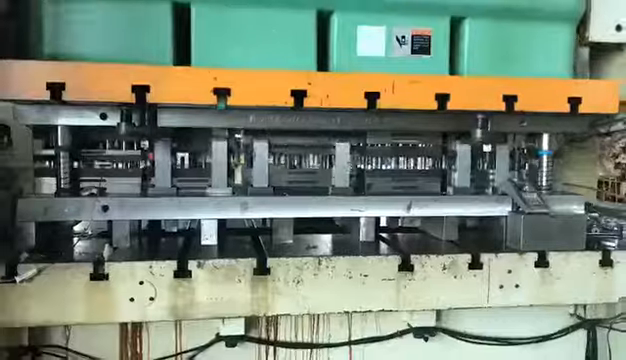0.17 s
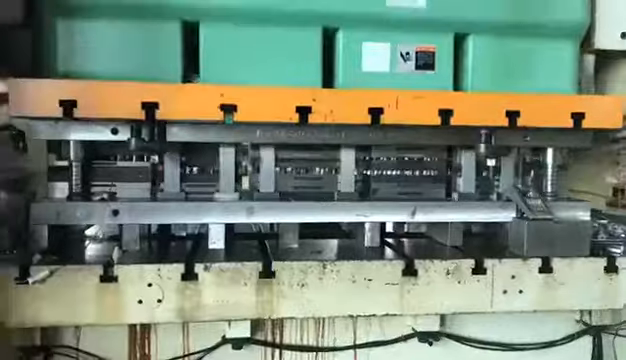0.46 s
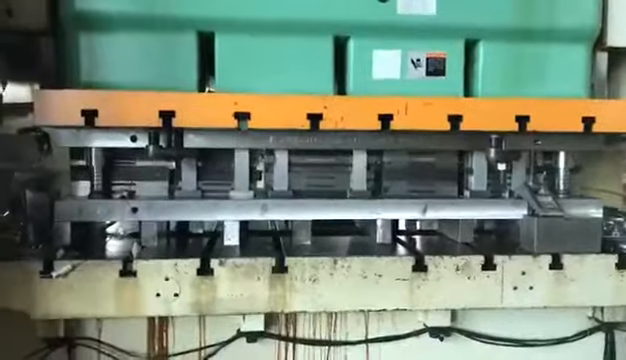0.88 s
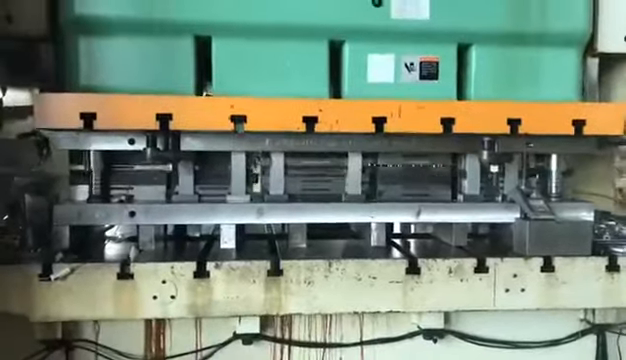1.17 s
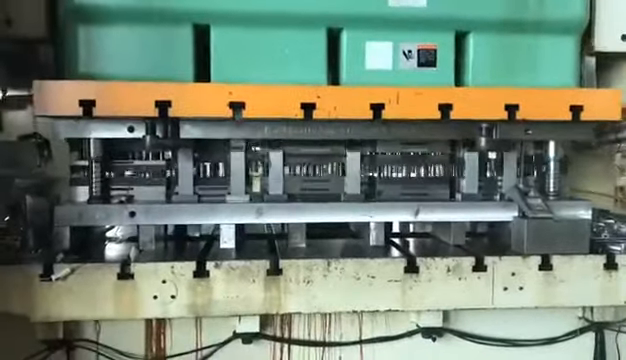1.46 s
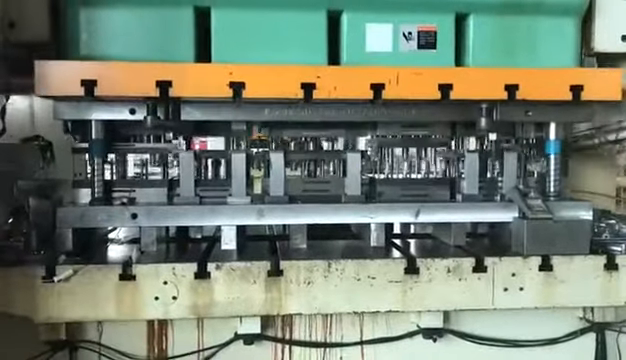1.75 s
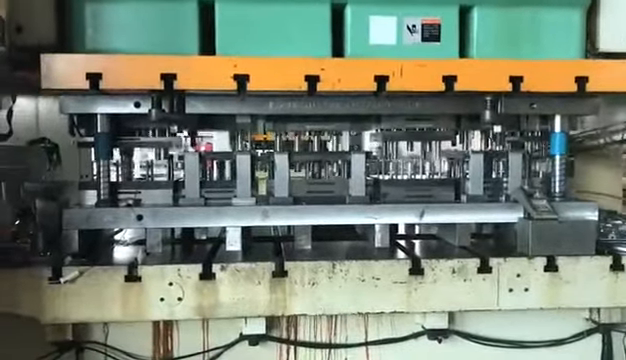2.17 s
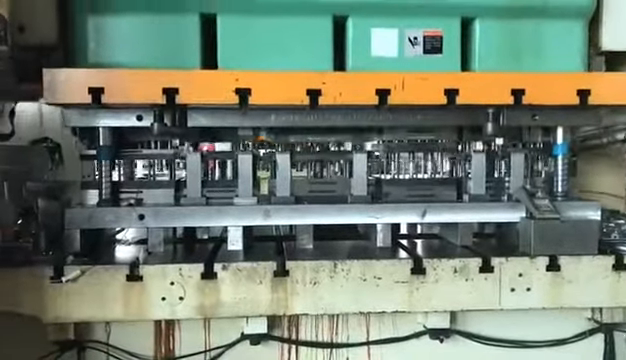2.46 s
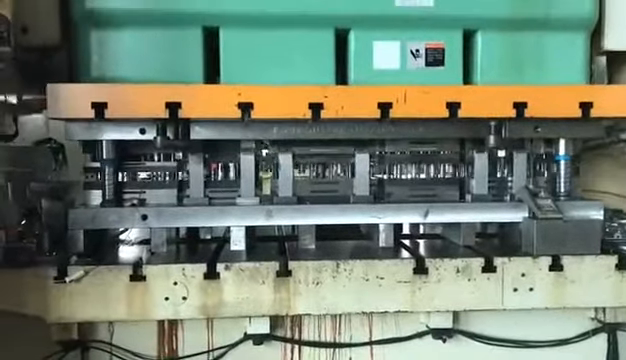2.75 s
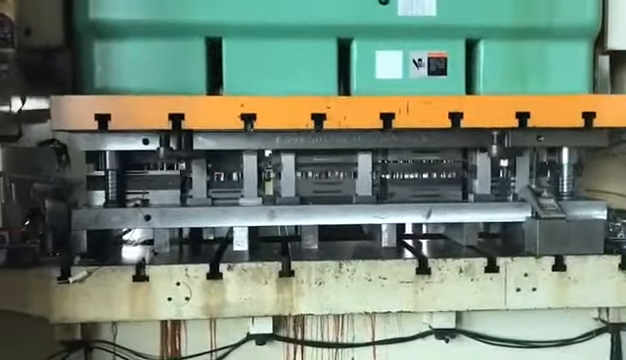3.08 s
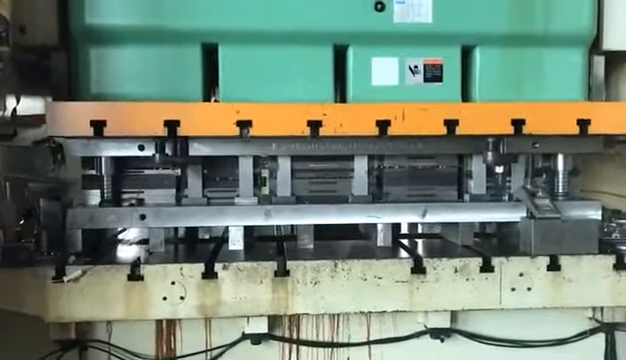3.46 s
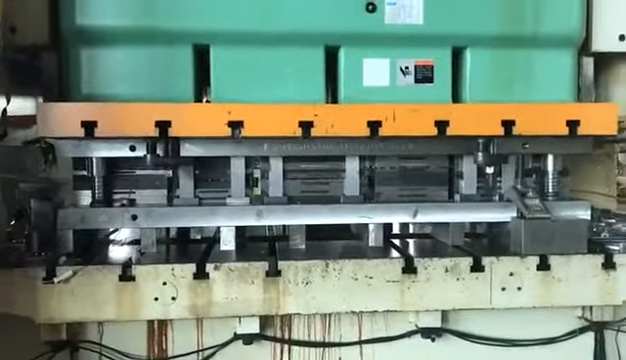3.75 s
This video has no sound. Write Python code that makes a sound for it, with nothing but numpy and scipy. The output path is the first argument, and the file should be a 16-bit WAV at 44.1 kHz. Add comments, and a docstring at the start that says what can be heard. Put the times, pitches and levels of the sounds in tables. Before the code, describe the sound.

A large stamping press thuds twice, with rail clanks, air hisses and steady machine noise.

```python
"""A large stamping press makes two slow strokes: each is a deep thud of decaying frame modes and die noise.
The guides sing before each stroke as narrow-band noise that follows a pitch curve.
Around the strokes transfer rails clank and squeak, the linkage knocks and air valves blow off shaped noise.
Motor hum, wavering tones, drive rumble, sliding rails and hall noise run underneath, all as filtered noise
or drifting tones. After a short silence the mono, band-limited sound cuts in loud, settles and is limited."""
import sys
import numpy as np
from scipy import signal
from scipy.fft import rfft, irfft
from scipy.io import wavfile
from scipy.ndimage import uniform_filter1d, minimum_filter1d

SR = 44100
rng = np.random.default_rng(int(sys.argv[2]) if len(sys.argv) > 2 else 0)


def store_wav(level_fs):
    """Save 16-bit WAV to argv[1]."""
    pcm = np.round(np.clip(np.atleast_2d(level_fs), -1, 1) * 32767)
    wavfile.write(sys.argv[1], SR, pcm.T.astype(np.int16))


N = 172872  # length [samples]

# die closing and opening: (time [s], boom level [dB], crunch level [dB], bottoming delay [s],
# bottoming level [dB])
PRESS_STROKES = [(0.900, -13, -21.5, .030, -20), (3.582, -13.5, -22, 0.0304, -23)]
# modes of the press frame: (frequency [Hz], relative level [dB], t60 [s])
FRAME_MODES = [(95.9, -7.5, 0.39), (103, 1, 0.19), (129.2, -8.5, 0.32), (153.8, -9, .4), (251.4, -20.5, .3),
               (289.6, -14, .4), (338.7, -17, .35), (404, -16.5, 0.39), (490, -14, 0.31),
               (702.6, -6.5, 0.18), (790, -11.5, 0.13), (891, -12, .1), (951, -12, .15), (1290, -20, .25)]


def amp(db):
    """Converts decibels to an amplitude ratio."""
    return 10 ** (np.asarray(db) / 20)


def unit(x):
    """Normalises a signal to unit rms."""
    return x / np.sqrt(np.mean(x ** 2) + 1e-20)


def read(points, hz):
    """Interpolates a table linearly on a log-frequency axis."""
    f, value = np.transpose(points)
    return np.interp(np.log(hz + 1), np.log(f + 1), value)


def level(points):
    """Gain along an envelope of (time [s], level [dB]), linear in decibels."""
    return amp(np.interp(np.arange(N) / SR, *np.transpose(points)))


def add(mix, s, sound):
    """Superposes a sound on the mix, starting at s seconds."""
    part = mix[max(round(s * SR), 0):][:len(sound)]
    part += sound[:len(part)]


def noise(spectrum, size):
    """Random-phase synthesis: noise of a prescribed magnitude spectrum."""
    hz = np.fft.rfftfreq(size, 1 / SR)
    phase = 2 * np.pi * rng.random(len(hz))
    return unit(irfft(amp(read(spectrum, hz)) * np.exp(1j * phase), size))


def wander(rate_hz, size):
    """Slow random motion: white noise low-passed at rate_hz."""
    hz = np.fft.rfftfreq(size, 1 / SR)
    return unit(irfft(rfft(rng.standard_normal(size)) / (1 + (hz / rate_hz) ** 4), size))


def whistle(hz, width_hz):
    """Narrow-band noise: random quadrature amplitudes on a carrier that follows a pitch curve."""
    phase = 2 * np.pi * np.cumsum(hz) / SR
    in_phase = wander(width_hz / 2, len(hz)) * np.cos(phase)
    quadrature = wander(width_hz / 2, len(hz)) * np.sin(phase)
    return unit(in_phase + quadrature)


def dying(x, t60):
    """Frequency-dependent damping: each band decays exponentially with its own t60."""
    hz, t, z = signal.stft(x, SR, nperseg=256)
    decay = amp(-60 * t / read(t60, hz)[:, None])
    return signal.istft(z * decay, SR, nperseg=256)[1][:len(x)]


def ring(modes, rise_s, detune):
    """Modal synthesis: damped sines, each randomly detuned at every blow."""
    t = np.arange(SR) / SR
    out = np.zeros(SR)
    for hz, db, t60 in modes:
        blow_hz = hz * (1 + detune * rng.standard_normal())
        out += amp(db) * np.exp(-np.log(1000) * t / t60) * np.sin(2 * np.pi * blow_hz * t)
    return out * (1 - np.exp(-t / rise_s))


def restless(spectrum, patch_db, flicker_db):
    """Non-stationary noise: drifting time-frequency patches and a flicker shared by all bands."""
    z = signal.stft(noise(spectrum, N), nperseg=512)[2]
    across_bands = uniform_filter1d(rng.standard_normal(z.shape), size=5, axis=0)
    patches = unit(uniform_filter1d(across_bands, size=10, axis=1))
    flicker = unit(uniform_filter1d(rng.standard_normal(z.shape[1]), size=3))
    gain = amp(patch_db * patches + flicker_db * flicker)
    return unit(signal.istft(z * gain, nperseg=512)[1][:N])


def through_frame(x):
    """Resonant transmission: lifts the frame's modes, with peaks that widen with frequency."""
    lift_db, width_hz, widening = 4, 4.5, 0.0083  # widening [Hz per Hz]
    hz = np.fft.rfftfreq(len(x), 1 / SR)
    peaks = sum(1 / (1 + ((hz - f) / (width_hz + widening * f)) ** 2) for f, *_ in FRAME_MODES)
    return unit(irfft(rfft(x) * amp(lift_db * np.minimum(peaks, 1)), len(x)))


def strokes():
    """Impact excitation of modes: pad touch, punch snap and crunch, ram bottoming, die release."""
    # dense ring of the die: (frequency [Hz], relative density [dB per Hz])
    die_spectrum = [(50, -14.5), (100, -7.5), (250, -9), (550, -5.5), (850, -1), (1250, -7), (1700, -17.5),
                    (4000, -17), (8000, -24)]
    # its damping: (frequency [Hz], t60 [s])
    die_t60 = [(100, 0.75), (400, 0.49), (900, 0.2), (2500, 0.17), (8000, 0.1)]
    touch_lead_s, touch_db = 0.0192, -8.5  # level relative to the boom
    release_delay_s, release_db = 0.13, -7.5  # level relative to the boom
    snap_db, snap_decay_s = -26.5, .008
    out, t = np.zeros(N), np.arange(SR) / SR
    for s, boom_db, crunch_db, bottom_s, bottom_db in PRESS_STROKES:
        touch = ring(FRAME_MODES[:4], rise_s=0.0019, detune=.01) * np.exp(-t / 0.023)
        add(out, s - touch_lead_s, amp(boom_db + touch_db) * touch)

        add(out, s, amp(boom_db) * ring(FRAME_MODES, rise_s=.004, detune=0.0022))
        crunch = dying(noise(die_spectrum, SR), die_t60) * np.minimum(t / 0.0012, 1)
        add(out, s, amp(crunch_db) * crunch)
        add(out, s, amp(snap_db) * rng.standard_normal(SR) * np.exp(-t / snap_decay_s))

        bottom = ring(FRAME_MODES[:9], rise_s=0.002, detune=0.0066) * np.exp(-t / 0.043)
        add(out, s + bottom_s, amp(bottom_db) * bottom)

        release = ring(FRAME_MODES[:8], rise_s=.002, detune=.02) * np.exp(-t / 0.014)
        add(out, s + release_delay_s, amp(boom_db + release_db) * release)
    return out


def guides():
    """Narrow-band song of the ram's guides on the way down, gliding in pitch before each stroke."""
    # pitch and level curve: (time before the stroke [s], frequency [Hz], level [dB])
    glide = [(.66, 4500, -44), (.55, 3700, -48), (.49, 4100, -36.5), (.4, 4150, -35), (.29, 4280, -38.5),
             (0.17, 4300, -51.5), (.08, 4300, -52.5)]
    out, t = np.zeros(N), np.arange(N) / SR
    before, hz, db = np.transpose(glide)
    for s, *_ in PRESS_STROKES:
        song = whistle(np.interp(t, s - before, hz), width_hz=560)
        out += song * np.interp(t, s - before, amp(db), 0, 0)  # silent outside the curve
    return out


def clanks():
    """Impact of the transfer rails on their stops: rail modes ring and loose parts rattle as noise."""
    # impacts: (time [s], ring level [dB], rattle level [dB])
    impacts = [(1.641, -18.5, -17.5), (1.647, -23, -21.5), (1.702, -30.5, -22.5), (2.820, -35, -26.5),
               (2.846, -35, -24), (2.893, -34.5, -34)]
    # rail modes: (frequency [Hz], relative level [dB], t60 [s])
    rail_modes = [(345, 1.5, 0.079), (567, -3, 0.09), (748, -5, 0.09), (907, -2.5, 0.13),
                  (1070, -10.5, .12), (1605, -1, 0.063), (1967, -7, .06), (2350, 0, 0.076),
                  (2420, -7, 0.19), (2517, 3, 0.091), (2830, -11, .08), (3340, -11.5, .07),
                  (3460, -8.5, 0.055)]
    # rattle spectrum: (frequency [Hz], relative level [dB])
    rattle_spectrum = [(100, -21), (340, -2.5), (900, -4.5), (1400, -5), (2000, -4.5), (2500, 0),
                       (3300, -17.5), (4500, -13.5), (8000, -25.5)]
    # rattle damping: (frequency [Hz], t60 [s])
    rattle_t60 = [(200, 0.14), (1500, 0.14), (8000, .06)]
    out, t = np.zeros(N), np.arange(SR) / SR
    for s, ring_db, rattle_db in impacts:
        add(out, s, amp(ring_db) * ring(rail_modes, rise_s=0.0005, detune=0.0072))
        rattle = dying(noise(rattle_spectrum, SR), rattle_t60) * np.minimum(t / 0.0011, 1)
        add(out, s, amp(rattle_db) * rattle)
    return out


def squeaks():
    """Stick-slip of metal on metal: short frequency-modulated tones of random pitch jitter."""
    # rail squeaks: (time [s], length [s], frequency [Hz], pitch jitter [Hz], level before fades [dB])
    slips = [(1.583, .016, 4240, 90, -25.5), (1.597, 0.02, 6980, 30, -25.5), (1.612, 0.03, 6995, 35, -30),
             (1.58, 0.078, 5970, 905, -33), (2.01, 0.27, 3500, 80, -44), (2.864, .05, 2466, 70, -31)]
    out = np.zeros(N)
    for s, length, hz, jitter_hz, db in slips:
        n = int(length * SR)
        cycles = np.cumsum(hz + jitter_hz * wander(350, SR)[:n]) / SR
        add(out, s, amp(db) * unit(np.sin(2 * np.pi * cycles)) * np.hanning(n) ** .5)
    return out


def knocks():
    """Band-limited impulsive noise: dull linkage thumps passed through the frame's resonances."""
    # thumps: (time [s], level before the envelope [dB], centre frequency [Hz])
    thumps = [(0.224, -30.5, 338), (0.374, -25.5, 250), (.572, -23, 145), (.577, -32.5, 700),
              (1.091, -29, 130), (1.225, -25.5, 125), (1.272, -23.5, 324), (1.345, -26.5, 726),
              (1.380, -24, 330), (1.385, -37, 800), (1.435, -29.5, 276), (1.76, -33, 268),
              (2.505, -29.5, 277), (2.555, -30, 286), (2.614, -29, 260), (2.765, -25.5, 243),
              (2.809, -24.5, 263), (2.85, -33.5, 327), (3.055, -26, 308), (3.255, -27.5, 115),
              (3.258, -33.5, 750), (3.775, -29, 125)]
    half_width_octaves, t60_s, rise_s = 0.31, 0.16, .006  # half-width at -6 dB
    t, hz = np.arange(SR // 2) / SR, np.geomspace(20, 8000, 80)
    envelope = np.minimum(t / rise_s, 1) * np.exp(-np.log(1000) * t / t60_s)
    out = np.zeros(N)
    for s, db, centre_hz in thumps:
        octaves = np.log2(hz / centre_hz)
        band = np.c_[hz, -20 * np.log10(1 + (octaves / half_width_octaves) ** 2)]
        add(out, s, amp(db) * through_frame(noise(band, len(t))) * envelope)
    return out


def air():
    """Jet noise: a valve opens, the pressure sags and the sputtering hiss dies in the hall."""
    # valve openings: (time [s], hold [s], level before the envelope [dB])
    openings = [(1.374, 0.07, -20), (2.772, 0.081, -19), (2.095, 0.013, -27)]
    # jet spectrum: (frequency [Hz], relative level [dB])
    jet_spectrum = [(300, -7), (1200, -6.5), (2000, -6.5), (2600, 1.5), (3300, -2.5), (4200, 1.5),
                    (5300, -1), (7000, 4), (8000, -4)]
    rise_s, sag_db_per_s, t60_s = .012, -19.5, .25
    sputter_db, sputter_hz = 1.5, 90
    out, t = np.zeros(N), np.arange(SR) / SR
    for s, hold_s, db in openings:
        pressure = np.minimum(t / rise_s, 1) * amp(db + sag_db_per_s * t)
        decay = np.exp(-np.log(1000) * np.maximum(t - hold_s, 0) / t60_s)
        sputter = amp(sputter_db * wander(sputter_hz, SR))
        add(out, s, pressure * decay * noise(jet_spectrum, SR) * sputter)
    return out


def sliding():
    """Friction noise of the sliding rails: shaped noise under a level envelope."""
    # spectrum: (frequency [Hz], relative density [dB per Hz])
    slide_spectrum = [(500, -38), (1700, -12), (2150, -12.5), (2520, -1), (3000, -8), (3650, -6),
                      (4000, -1.5), (4600, -5.5), (5100, -11), (6800, -5.5), (8000, -20)]
    # envelope: (time [s], level [dB])
    slide_level = [(.17, -33.5), (.7, -35.5), (1.15, -52), (1.5, -34), (1.8, -36.5), (2.03, -31),
                   (2.3, -32.5), (2.55, -31), (2.7, -32), (2.95, -37), (3.2, -34), (3.45, -43.5),
                   (3.92, -41)]
    return level(slide_level) * restless(slide_spectrum, patch_db=2.5, flicker_db=1.0)


def drive():
    """Structure-borne rumble: drive noise coloured by the frame's resonances."""
    # spectrum before the frame: (frequency [Hz], relative density [dB per Hz])
    drive_spectrum = [(30, -10), (90, -5), (170, 1.5), (350, -4.5), (520, -13), (750, -10), (1300, -9),
                      (2500, -17.5), (8000, -19)]
    # envelope: (time [s], level [dB])
    drive_level = [(.17, -34.5), (.6, -32.5), (.8, -33), (1.05, -35), (1.35, -33.5), (1.7, -33.5),
                   (2.0, -38.5), (2.42, -46), (2.6, -35), (2.9, -32.5), (3.2, -35), (3.45, -31.5),
                   (3.92, -38)]
    rumble = through_frame(restless(drive_spectrum, patch_db=3.0, flicker_db=1.14))
    return level(drive_level) * rumble


def motor():
    """Frequency modulation: a low sine whose pitch drifts randomly by 2.9 % rms."""
    hz = 48.85 * (1 + 0.029 * wander(5.4, N))
    return amp(-44) * unit(np.sin(2 * np.pi * np.cumsum(hz) / SR))


def machine_tones():
    """Narrow-band random processes: wavering tones at fixed centre frequencies."""
    # tones: (frequency [Hz], width [Hz], level [dB])
    tones = [(47.46, 22, -40.5), (92.1, 35, -47), (168.6, 11, -47), (349, 10, -52.5), (1271, 54, -54.5),
             (2510, 70, -49), (4040, 130, -50.5), (7040, 70, -50.5), (4485, 190, -45.5)]
    return sum(amp(db) * whistle(np.full(N, hz), width_hz) for hz, width_hz, db in tones)


def hall_noise():
    """Broadband background of the hall: shaped noise with gentle random modulation."""
    # spectrum: (frequency [Hz], relative density [dB per Hz])
    hall_spectrum = [(15, -14.5), (28, 4.5), (42, 5.5), (65, 4), (110, -3.5), (170, -5), (300, -3),
                     (520, -11.5), (1000, -15), (1800, -12), (2200, -7), (2550, -8), (3100, -12),
                     (4000, -9), (5200, -8.5), (6200, -8.5), (7200, -7.5), (8000, -10.5)]
    return amp(-28) * restless(hall_spectrum, patch_db=1.5, flicker_db=1.3)


def reverberate(press, rails):
    """Reverberation: convolution with a unit-energy noise tail damped band by band."""
    # hall decay: (frequency [Hz], t60 [s])
    hall_t60 = [(100, 1), (1000, 0.66), (8000, .35)]
    press_db, rails_db = -13, -15.5  # levels sent into the hall
    build_up = np.minimum(np.arange(SR) / SR / 0.015, 1)
    tail = dying(rng.standard_normal(SR), hall_t60) * build_up
    sent = amp(press_db) * press + amp(rails_db) * rails
    return signal.fftconvolve(sent, tail / np.linalg.norm(tail))[:N]


def scene():
    """Superposition of direct sound, reverberation and background, alike in both channels."""
    press, rails = strokes() + knocks() + air(), clanks()
    machinery = sliding() + drive() + motor() + machine_tones() + hall_noise()
    mid = press + rails + reverberate(press, rails) + guides() + squeaks() + machinery
    return np.array([mid, mid])


def record(dry):
    """Band limiting and peak limiting: the sound cuts in loud, settles, and its peaks are held."""
    start_s, excess_db, settle_s = .166, 7.5, .055
    limit_db, hold_s = -7.9, .004
    t = np.arange(N) / SR - start_s
    low_pass = signal.firwin(801, 7680, window=("kaiser", 8), fs=SR)[None]  # cutoff [Hz]
    onset = (t > 0) * amp(excess_db * np.exp(-np.maximum(t, 0) / settle_s))
    x = signal.oaconvolve(dry, low_pass, "same") * onset
    hold = int(hold_s * SR)
    needed = np.minimum(1, amp(limit_db) / (abs(x).max(0) + 1e-9))
    gain = uniform_filter1d(minimum_filter1d(needed, hold), hold)  # held, then smoothed
    return signal.oaconvolve(x * gain, low_pass, "same")


dry = scene()
out = record(dry)
store_wav(out)
```